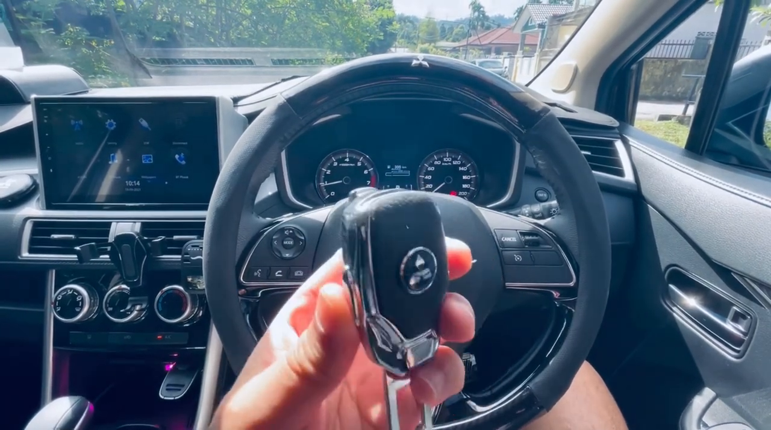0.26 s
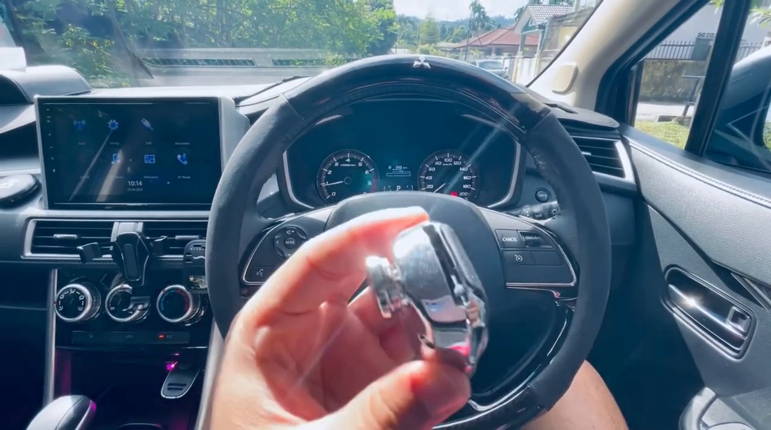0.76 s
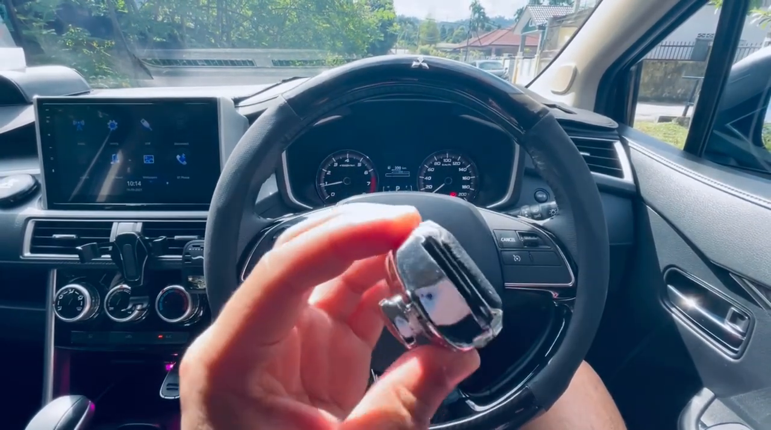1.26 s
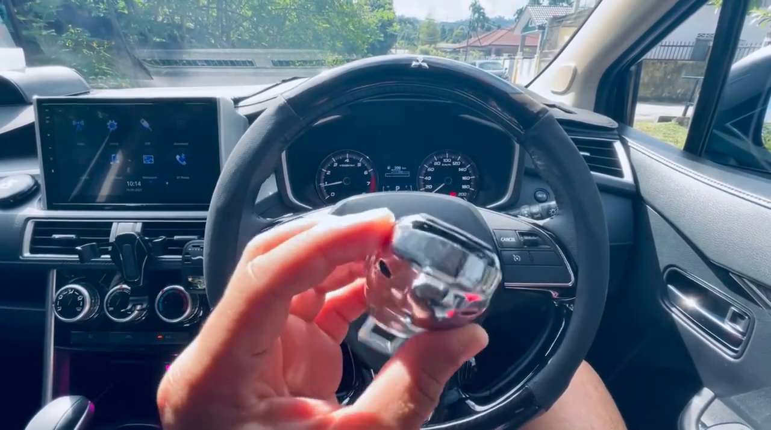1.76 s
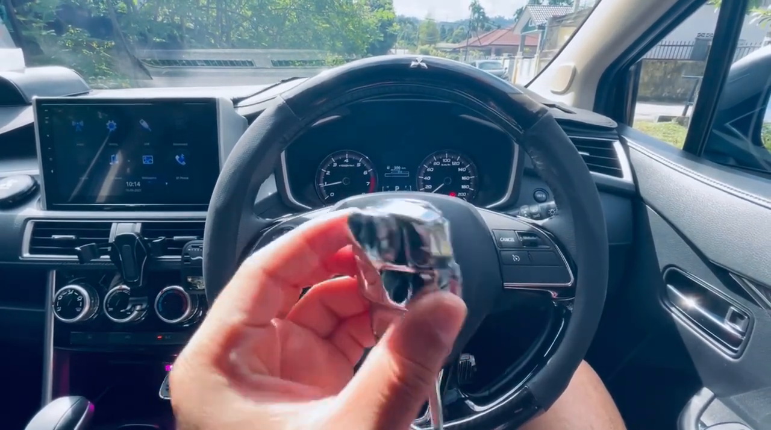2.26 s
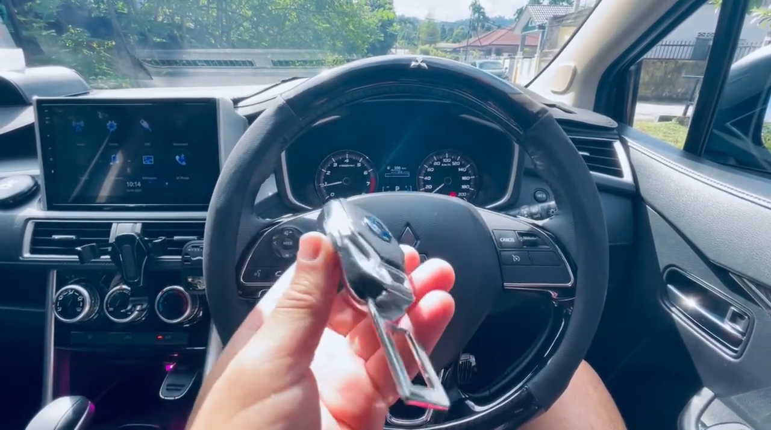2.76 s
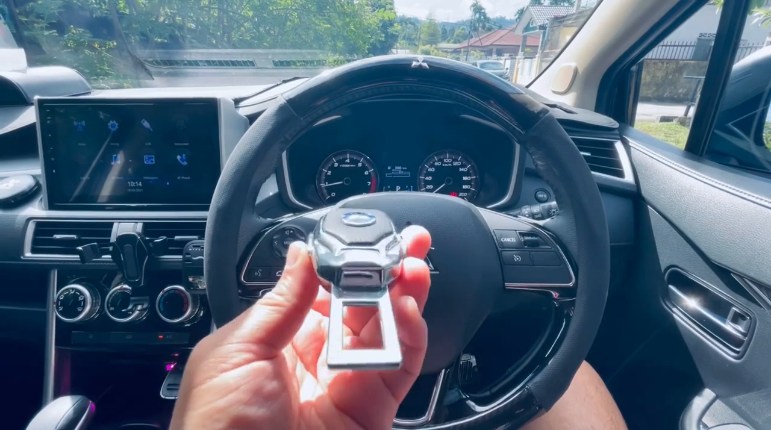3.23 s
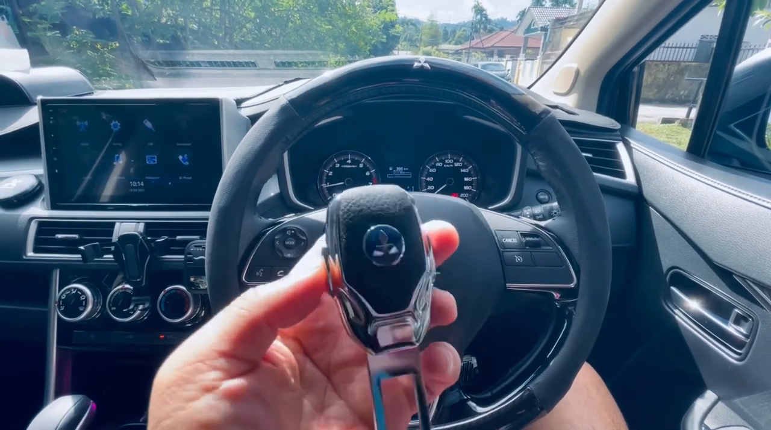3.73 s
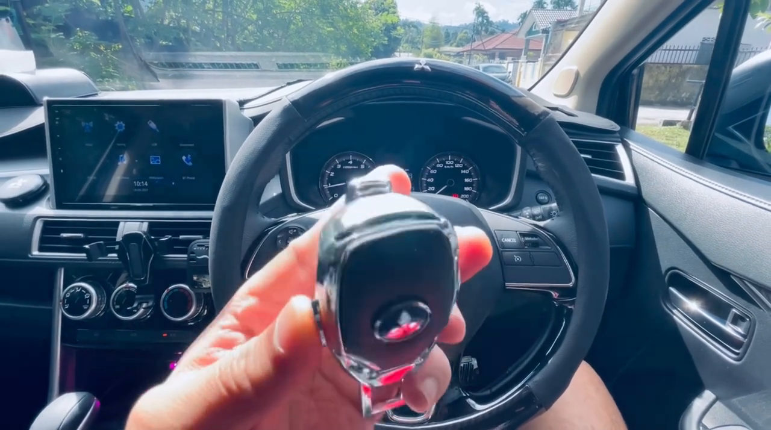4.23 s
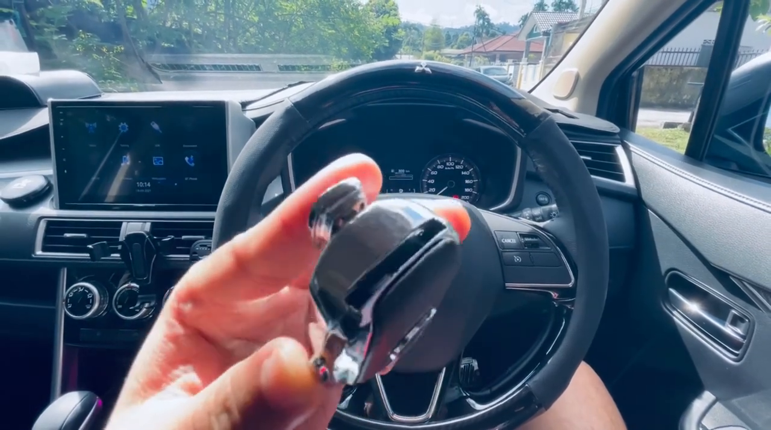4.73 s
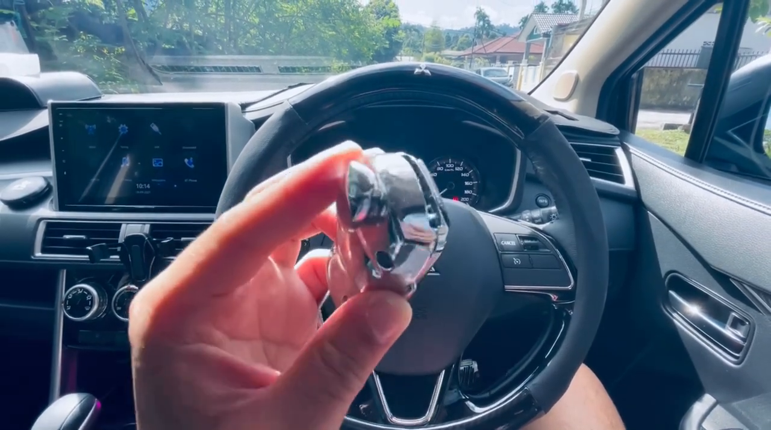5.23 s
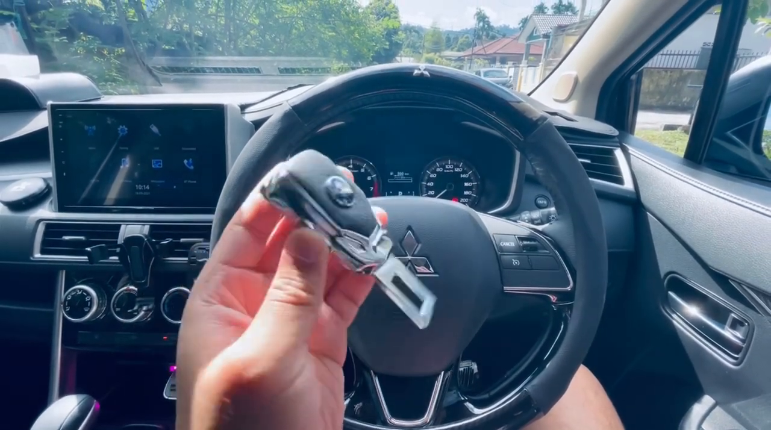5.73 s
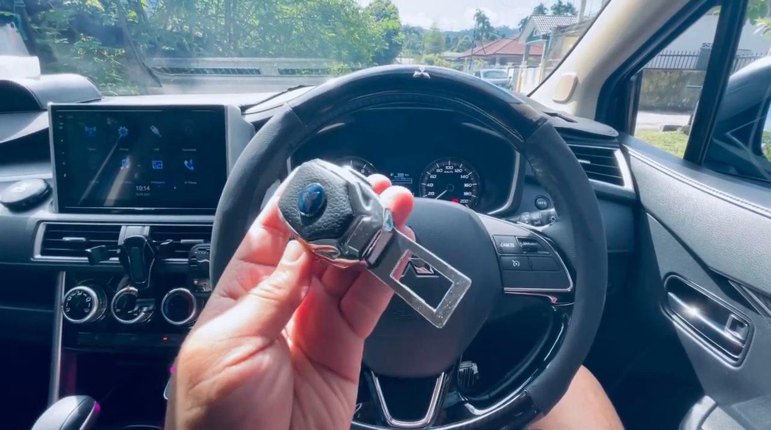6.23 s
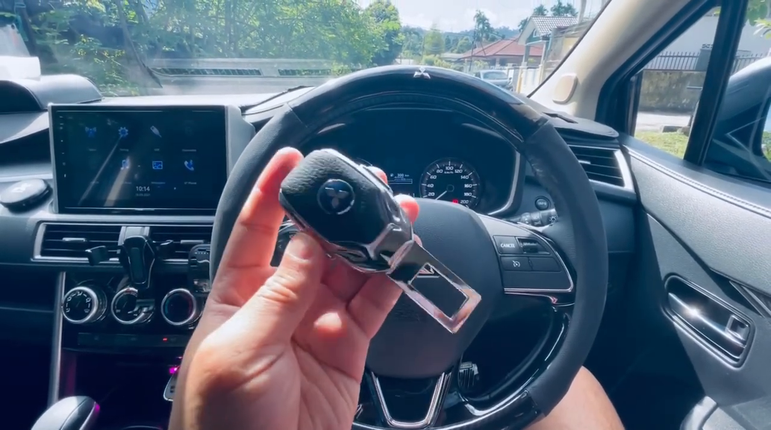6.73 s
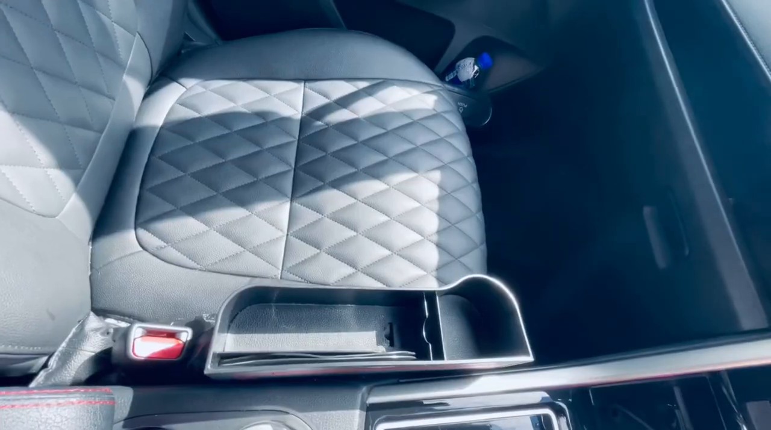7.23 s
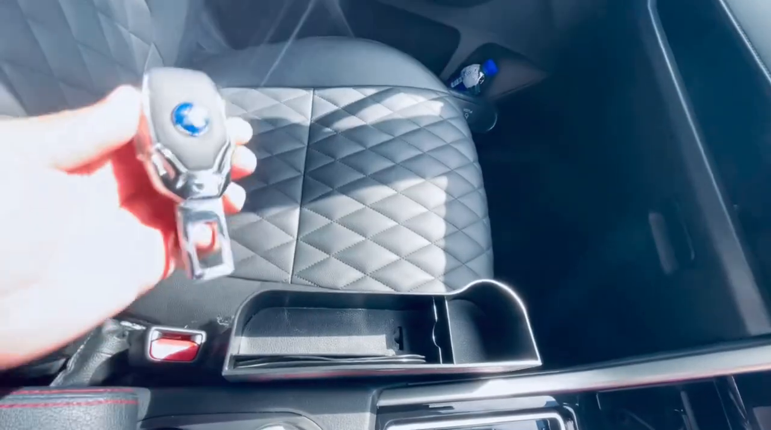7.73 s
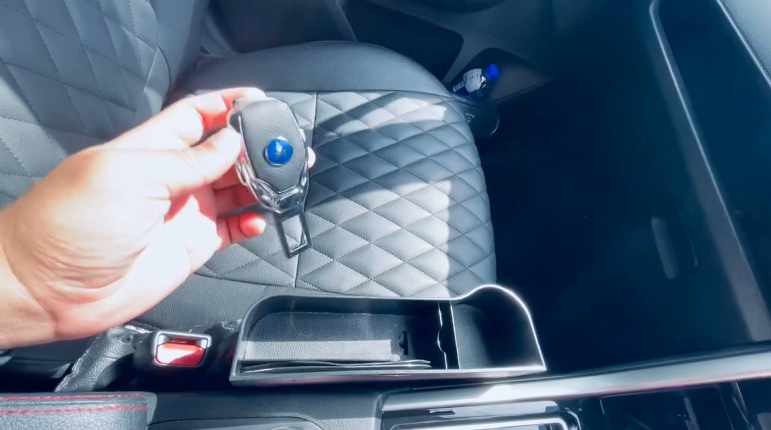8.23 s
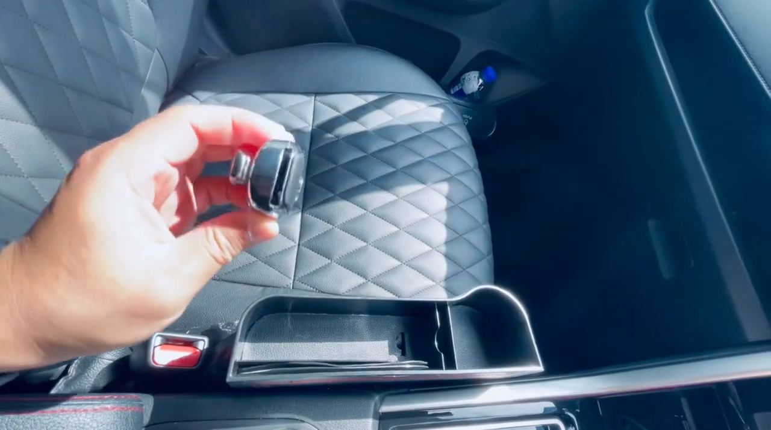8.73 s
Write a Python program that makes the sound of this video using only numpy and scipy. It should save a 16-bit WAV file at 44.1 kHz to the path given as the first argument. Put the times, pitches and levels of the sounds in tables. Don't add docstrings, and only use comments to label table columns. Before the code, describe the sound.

Inside a parked idling car, a deep steady engine hum and soft air conditioning hiss run throughout. A dull bump on the microphone case comes early, with fainter nudges and two tiny metal ticks. Around seven seconds the sound cuts to the seat: cloth drags briskly over upholstery while a loose metal tongue rattles, then sparse ticks and short rubs follow. Close stereo microphone, small padded cabin.

```python
import sys
import numpy as np
from scipy import signal
from scipy.fft import rfft, irfft, next_fast_len
from scipy.io import wavfile

SR = 44100
rng = np.random.default_rng(int(sys.argv[2]) if len(sys.argv) > 2 else 0)


def to_linear_factor(level_db):
    exponent = np.asarray(level_db, float) / 20
    return 10 ** exponent


def output_pcm(signal):
    pcm = np.clip(np.atleast_2d(signal).T, -1, 1) * 32767
    wavfile.write(sys.argv[1], SR, np.round(pcm).astype(np.int16))


N = 396018
SIZE = next_fast_len(N + 4096)
START_HEIGHT, START_DECAY_S = -.011, .003
MOVE_S, MOVE_STEP_HEIGHT = 7.0393, .012
MIC_TOP_HZ = 16800

FIRING_HZ, COMPRESSOR_HZ, WHINE_HZ, REED_HZ = 28.28, 186.75, 3860, 4404
BLADE_HZ, BLADE_WANDER_HZ = 174.0, .6

# multiple of the base frequency, level at wheel in dB, level at seat in dB, wobble in dB,
# left over right in dB.
ENGINE_ORDERS = [(1, -49.5, -59, .5, .1), (2, -46.5, -43, 1.6, .1), (3, -50, -53, 2.2, .1),
                 (4, -48, -49, 2.2, -.4), (5, -60, -62, 2.2, -1.5), (9, -75, -53, 1.8, 1.5),
                 (10, -72, -62, 2.2, 1.5)]
COMPRESSOR_HARMONICS = [(1, -50, -50, .8, -2.5), (2, -68, -68, 1.5, 2.5), (3, -70, -69, 1.5, 2.5)]
FAN_HARMONICS = [(1, -47.5, -54.5, 2, -5), (2, -67.5, -97, 2, -10.5)]
WHINE_HARMONICS = [(1, -90, -110, 1.2, 0)]
REED_HARMONICS = [(1, -110, -85, 1.5, 0)]

# frequency in Hz, density in dB per Hz.
RUMBLE_WHEEL = [(8.2, -38.5), (14, -21), (76, 4), (98, 1.5), (135, -7), (177, -5.5), (203, -10.5),
                (236, -16.5), (262, -23), (300, -19.5), (367, -17), (542, -20.5), (699, -27), (800, -23),
                (1040, -59.5), (1760, -120)]
RUMBLE_SEAT = [(8.2, -29), (14, -10.5), (54, -0.5), (92, 4), (145, -5.5), (187, -6), (225, -10.5),
               (271, -10), (349, -14), (406, -15), (442, -22), (490, -15.5), (642, -24), (711, -45),
               (800, -32), (1040, -26.5), (1760, -120)]
VENT_WHEEL = [(350, -34), (600, -12), (702, -10), (876, 2), (948, -1), (999, -1), (1380, -1.5), (1640, -11),
              (2000, -14), (2270, -17.5), (2460, -24.5), (2990, -24), (3790, -28.5), (4790, -35),
              (13500, -45.5), (14000, -80.5)]
VENT_SEAT = [(350, -62), (600, 11), (720, 0), (854, 8.5), (1030, -1), (1300, 5.5), (1540, -3), (1970, -7.5),
             (2950, -18.5), (4260, -15.5), (4850, -27), (6140, -27.5), (11200, -31), (12900, -30),
             (13500, -42.5), (14000, -80)]
# at wheel in dB, at seat in dB.
RUMBLE_DB = [-38, -39]
VENT_DB = [-56, -53]
# frequency in Hz, width in Hz, level over hiss in dB.
DUCT_WHEEL = [(356.3, 12, 5.5), (2473, 110, 12), (3400, 740, 3), (12000, 250, -2.5)]
DUCT_SEAT = [(920, 430, 2.6), (1310, 38, 5.7), (3800, 190, 1.8), (11600, 300, 3)]
WHISTLES_WHEEL = [(407, 8, 6), (436, 6, 7), (489, 10, 4), (537, 10, 5), (1965, 60, 5), (3850, 70, 7),
                  (4397, 15, 10), (5855, 30, 6), (6075, 60, 7), (13110, 40, 11)]
WHISTLES_SEAT = [(4404, 30, 8)]

# frequency in Hz, likeness 0 to 1.
LIKE_WHEEL = [(30, .62), (100, .7), (200, .65), (300, .3), (600, .5), (1000, .5), (1250, .4), (2000, .55),
              (3500, .35), (5000, .25), (9000, .25), (10800, .45), (11400, .9), (14000, .7)]
LIKE_SEAT = [(30, .7), (170, .88), (450, .5), (1000, .38), (2000, .62), (4000, .55), (6000, .6),
             (9000, .25), (10800, .45), (11600, .85), (12500, .7), (13300, .55), (14400, .85)]
# frequency in Hz, phase in radians.
LEAD_WHEEL = [(0, 0), (520, 0), (800, 2.6), (1100, 3.1), (1600, 3.5), (2300, 6.3), (5500, 15.7), (9000, 22),
              (11000, 18.85), (12500, 18.85), (14000, 15.7)]
LEAD_SEAT = [(0, 0), (300, -.3), (600, -2), (1600, -2.6), (2500, 0), (6000, 9.4), (9000, 15.7),
             (11000, 12.9), (11700, 12.57), (12400, 12.1), (13100, 11.3), (14400, 9.4)]
# frequency in Hz, left over right in dB.
TILT_WHEEL = [(60, 2), (190, -4.5), (430, 5.5), (680, -1), (870, 7), (1600, -0.5), (3500, -1.5),
              (6000, 3.5), (8000, 1), (9600, -7.5), (11000, -0.5)]
TILT_SEAT = [(60, -2), (350, 5), (700, 0.5), (3800, -1.5), (5500, 2), (8000, 1), (9600, -13.5), (11000, 0)]

KNOCK_S, KNOCK_HZ = 1.0768, 180
NUDGE_RISE_S, NUDGE_HZ = .006, 200
# left in dB, right in dB.
KNOCK_DB = [-17.5, -28.5]
# left in dB, right in dB.
NUDGE_DB = [4, -1.5]
# onset in seconds, peak in dB.
NUDGES = [
    (0.657, -37),
    (1.799, -45),
    (2.25, -39),
    (4.066, -43),
]

# start in seconds, peak in dB, frequency in Hz, t60 in seconds.
THUDS = [
    (7.25, -45, 844, .06),
    (7.339, -42.5, 638, 0.13),
    (7.632, -45, 874, .08),
    (7.775, -53, 920, .05),
]

# time in seconds, drag in dB, cushion pressure in dB.
DRAG = [
    (7.044, -60, -10),
    (7.065, -50.5, -7),
    (7.125, -38.5, 8),
    (7.2, -45, -11),
    (7.27, -45.5, 13),
    (7.315, -53.5, -9),
    (7.345, -46, 11),
    (7.43, -56, 10),
    (7.46, -62, -4),
]
# start in seconds, hold in seconds, drag in dB, brightness in dB.
RUBS = [(7.462, 0.0059, -68, -8), (7.493, 0.06, -61, 5.5), (7.61, 0.02, -61, -3), (7.633, 0.039, -51, -1.5),
        (7.722, 0.02, -57.5, 1), (7.746, 0.021, -60, -8), (7.774, 0.02, -55.5, -2),
        (7.856, 0.0073, -64.5, 8), (7.876, .018, -70, 3), (7.943, .01, -66, -10), (8.021, 0.019, -59.5, 1),
        (8.07, 0.01, -67, 7), (8.136, .014, -66.5, 4), (8.488, 0.01, -64, 4), (8.643, 0.03, -61.5, 4),
        (8.886, 0.017, -63, -19), (8.928, 0.0158, -69, -9), (8.966, .02, -68, 14.5), (1.769, .015, -75, 2),
        (1.799, 0.0074, -77, 21.5)]
RUB_ATTACK_S, RUB_RELEASE_DB_PER_S, RUB_PRESS_DB, SWEEP_BRIGHT_DB = 0.0018, 498, 9.5, 3.5
# frequency in Hz, density in dB per Hz.
CLOTH = [(290, -13), (500, -5), (632, -6), (706, -10.5), (869, -7), (1080, -12), (1510, -6.5), (2020, -7.5),
         (2890, -7.5), (3660, 6), (4700, -3.5), (6020, -2), (7940, -5.5), (12200, -16.5), (13300, -20),
         (13900, -60.5)]
# frequency in Hz, width in Hz, level in dB.
SEAT_BODY = [(2520, 140, 8), (2780, 110, 10), (3150, 200, 7), (4820, 44, -10), (6000, 200, -4),
             (7170, 370, -16)]
SLIP_TOGETHER, SLIP_APART = .2, .42
CLUMP_DB, CLUMPS_PER_S = 1.0, 14

# start in seconds, peak in dB.
GLINTS = [(7.2515, -46.5), (7.2575, -56.5), (7.266, -55), (7.328, -54), (7.339, -51.5), (7.344, -53),
          (7.618, -58), (7.6315, -67), (7.647, -59.5), (7.658, -61), (7.664, -65), (7.749, -56),
          (7.7585, -62), (7.7748, -61.5), (7.7873, -58), (7.8045, -71), (7.859, -67), (7.8815, -65),
          (8.0235, -68), (8.071, -66), (8.492, -57), (8.6457, -55), (8.667, -72), (8.888, -72),
          (1.7995, -74)]
GLINT_DECAY_S, GLINT_LOW_HZ = .0015, 13900
GLINT_APART = .6

# start in seconds, peak in dB, ring in Hz, second ring in Hz, second ring level in dB.
WHEEL_TICKS = [
    (1.7692, -59, 7800, 4200, -3),
    (1.7990, -48, 6300, 12200, -4),
]
SEAT_TICKS = [(7.0626, -38, 2670, 5620, -4.5), (7.066, -39, 3170, 6400, -11), (7.0934, -40.5, 4160, 9170, -10),
              (7.1084, -34, 9370, 3340, -5), (7.1185, -33, 8400, 12300, -2), (7.1226, -30.5, 3270, 6400, -7),
              (7.134, -35.5, 3380, 7340, 1.5), (7.144, -29.5, 4670, 8230, -6), (7.1606, -33, 3750, 10700, -4),
              (7.1686, -35, 3360, 5620, -3), (7.1967, -38, 2710, 8350, -6), (7.2207, -37, 2970, 5560, -10),
              (7.2315, -36, 2990, 6760, -9), (7.252, -26.5, 3020, 7800, -3), (7.258, -42, 3470, 7360, -6.5),
              (7.2835, -38, 6350, 2430, 4), (7.2886, -31, 3570, 5560, 0), (7.3132, -39, 2760, 6120, -9),
              (7.3165, -44, 8030, 2930, -2.5), (7.3285, -41.5, 11500, 3000, -2),
              (7.3358, -34.5, 2800, 7600, -4), (7.339, -35, 7900, 12200, -3), (7.3395, -33, 4300, 2600, -3),
              (7.3438, -33, 12300, 6400, -4), (7.355, -33.5, 2890, 5770, -7), (7.371, -42, 3550, 5510, -7),
              (7.3806, -35.5, 2990, 6310, 2), (7.385, -40.5, 8180, 3210, -4), (7.3947, -39.5, 6520, 8530, -5.5),
              (7.406, -40, 5320, 8050, -13), (7.415, -43, 5560, 8230, -1),
              (7.4284, -48, 3450, 6290, 5), (7.4347, -37.5, 3490, 6420, 0),
                  (7.4667, -45, 8300, 4890, -6), (7.482, -61, 2970, 5190, -2),
                  (7.495, -53.5, 5120, 2520, -4), (7.4998, -47, 4690, 9580, -1),
                  (7.504, -53, 5750, 2650, 0), (7.5174, -45, 2500, 5380, -13),
                  (7.5293, -43.5, 10100, 6610, -3), (7.558, -50.5, 10720, 5640, -2),
                  (7.6107, -53, 6550, 4180, 8), (7.6176, -42.5, 5170, 2650, -5),
                  (7.6313, -41.5, 8290, 4650, 2), (7.6468, -37, 5050, 2670, -7),
                  (7.6583, -48, 2730, 7840, -0.5), (7.6862, -55, 3450, 8160, -9),
                  (7.7237, -52, 4130, 6650, -10), (7.7297, -50, 3880, 9070, -6),
                  (7.748, -47, 12500, 6830, -3), (7.7537, -46, 6400, 2930, -1),
                  (7.759, -42.5, 8420, 12980, 1), (7.7759, -41.5, 5750, 8000, -3),
                  (7.7763, -39, 3000, 4800, -4), (7.788, -32.5, 5350, 7640, 0),
                  (7.805, -43.5, 5300, 7710, 1),
              (7.8495, -51, 3830, 12210, -8), (7.859, -48, 4540, 7990, 1),
                 (7.8626, -55.5, 4540, 2580, -2), (7.8758, -44, 9150, 4010, -5),
                 (7.8813, -42, 7770, 12420, -2), (7.9471, -45, 4900, 2650, -2),
                 (8.0044, -47, 4940, 2950, -5), (8.0232, -41, 4970, 7000, -8),
                 (8.0712, -47, 6500, 3080, -4), (8.08, -53, 6070, 2480, -7), (8.1268, -56, 4460, 2370, -10),
                 (8.139, -48.5, 6660, 4630, -9), (8.324, -59, 3940, 6030, -11),
                 (8.4857, -53.5, 5920, 2540, 0), (8.4924, -40, 6360, 10300, -4),
                 (8.4977, -51, 3570, 7240, -5), (8.6136, -54, 3210, 5450, -10),
                 (8.6462, -37, 9500, 5060, -1), (8.6673, -46, 6300, 4220, 2),
                 (8.6835, -54, 4410, 9150, -11), (8.7316, -55, 3450, 9630, -17),
                 (8.766, -57.5, 4690, 9600, -3), (8.7852, -54, 4030, 8310, -14),
                 (8.8865, -44.5, 4000, 6570, -2), (8.9312, -50, 2860, 6370, -16),
                 (8.9334, -57, 2800, 5210, -12), (8.9694, -50, 8660, 6590, -7)]
CRACK_DECAY_S, CRACK_LOW_HZ, RING_WIDTH_HZ = 0.00099, 1980, 1900
CRACK_DB, CRACK_DB_PER_DB = -10.5, 0.7
CRACK_IN_SWEEP_DB = -8
TAIL_DB, TAIL_WIDE = -8.5, 0.99


def rms_one(x):
    return x / np.sqrt(np.mean(x ** 2) + 1e-30)


def at_hz(points, hz):
    points = np.array(points)
    return np.interp(np.log(hz + 1), np.log(points[:, 0] + 1), points[:, 1])


def drift(changes_per_s):
    pole = np.exp(-80 * np.pi * changes_per_s / SR)
    white = rng.standard_normal(N // 40 + 4002)
    slow = signal.lfilter([1], [1, -2 * pole, pole * pole], white)[4000:]
    return np.interp(np.arange(N) / 40, np.arange(len(slow)), rms_one(slow))


def filtered(x, order, hz, kind):
    return signal.sosfilt(signal.butter(order, hz, kind, fs=SR, output="sos"), x)


def colour(pair, spectrum, peaks=()):
    hz = np.fft.rfftfreq(SIZE, 1 / SR)
    gain = to_linear_factor(at_hz(spectrum, hz))
    for peak_hz, width_hz, db in peaks:
        gain = gain * (1 + (to_linear_factor(db) - 1) / (1 + (2 * (hz - peak_hz) / width_hz) ** 2))
    return irfft(rfft(pair, SIZE) * gain, SIZE)


def ports(pair, like, lead, tilt):
    hz = np.fft.rfftfreq(SIZE, 1 / SR)
    left, other = rfft(pair)
    alike = np.clip(at_hz(like, hz), 0, 1)
    delay = np.exp(-1j * np.interp(hz, *np.transpose(lead)))
    right = alike * delay * left + np.sqrt(1 - alike ** 2) * other
    half_tilt = to_linear_factor(at_hz(tilt, hz) / 2)
    return irfft([left * half_tilt, right / half_tilt], SIZE)[:, :N]


def cabin_air(rumble, rumble_db, vent, vent_db, resonances):
    low = rms_one(colour(rng.standard_normal((2, SIZE)), rumble, resonances))
    flutter = np.resize(to_linear_factor(.3 * drift(9)), SIZE)
    high = rms_one(colour(rng.standard_normal((2, SIZE)) * flutter, vent, resonances))
    return to_linear_factor(rumble_db) * low + to_linear_factor(vent_db) * high


def tones(rows, hz, wobbles_per_s):
    turns = np.cumsum(hz * np.ones(N)) / SR
    seat = np.arange(N) >= MOVE_S * SR
    port_lag_turns = np.array([[0], [.08]])
    out = 0
    for multiple, wheel_db, seat_db, wobble_db, pan_db in rows:
        level = to_linear_factor(np.where(seat, seat_db, wheel_db) + wobble_db * drift(wobbles_per_s))
        start = rng.random(2)[seat * 1]
        phase_turns = np.round(multiple) * turns + start + port_lag_turns
        wave = np.sqrt(2) * level * np.sin(2 * np.pi * phase_turns)
        out = out + wave * to_linear_factor([[pan_db / 2], [-pan_db / 2]])
    return out


def machines():
    blade_hz = BLADE_HZ + BLADE_WANDER_HZ * drift(1.5)
    out = tones(ENGINE_ORDERS, FIRING_HZ, 3.6)
    out = out + tones(COMPRESSOR_HARMONICS, COMPRESSOR_HZ, 0.39)
    out = out + tones(FAN_HARMONICS, blade_hz, 3.8)
    out = out + tones(WHINE_HARMONICS, WHINE_HZ + 9 * drift(12), 6)
    return out + tones(REED_HARMONICS, REED_HZ + 4 * drift(8), 5)


def push(crest_s, hz, pair_db):
    u = (np.pi * hz * (np.arange(N) / SR - crest_s)) ** 2
    return (1 - 2 * u) * np.exp(-u) * to_linear_factor(pair_db)[:, None]


def knock():
    out = push(KNOCK_S, KNOCK_HZ, KNOCK_DB)
    for s, db in NUDGES:
        out = out + push(s + NUDGE_RISE_S, NUDGE_HZ, np.add(NUDGE_DB, db))
    return out


def thuds():
    t, out = np.arange(N) / SR, 0
    for s, peak_db, hz, t60_s in THUDS:
        age_s = np.maximum(t - s, 0)
        out = out + to_linear_factor(peak_db - 60 * age_s / t60_s) * np.sin(2 * np.pi * hz * age_s)
    return out


def slips(per_s, decay_s):
    size = to_linear_factor(4.0 * np.minimum(rng.exponential(1, N), 3))
    marks = (rng.random(N) < per_s / SR) * size
    return signal.lfilter([1], [1, -np.exp(-1 / (decay_s * SR))], marks + 1e-18)


def effort():
    t = np.arange(N) / SR
    s, drag_db, press_db = np.transpose(DRAG)
    release_db = RUB_RELEASE_DB_PER_S * np.maximum(t - s[-1], 0)
    level = to_linear_factor(np.interp(t, s, drag_db) - release_db) * (t > s[0])
    bright = level * to_linear_factor(SWEEP_BRIGHT_DB)
    press = level * to_linear_factor(np.interp(t, s, press_db))
    for start_s, held_s, rub_db, bright_db in RUBS:
        attack = np.clip((t - start_s) / RUB_ATTACK_S + .5, 0, 1)
        release_db = RUB_RELEASE_DB_PER_S * np.maximum(t - start_s - held_s, 0)
        rub = attack * to_linear_factor(rub_db - release_db)
        level = level + rub
        bright = bright + rub * to_linear_factor(bright_db)
        press = press + rub * to_linear_factor(RUB_PRESS_DB)
    return level, bright, press


def sleeve():
    level, bright, press = effort()
    together, white, grains = slips(440, 0.001), rng.standard_normal((2, N)), 0
    edges_hz = [300, 3700, 6000, 9500, 18000]
    for low_hz, high_hz in zip(edges_hz, edges_hz[1:]):
        band = filtered(white, 2, [low_hz, high_hz], "band")
        slipping = 1 + SLIP_TOGETHER * together + SLIP_APART * slips(220, 0.0011)
        grains = grains + band * slipping * to_linear_factor(CLUMP_DB * drift(CLUMPS_PER_S))
    cloth = rms_one(colour(grains, CLOTH, SEAT_BODY)[:, :N])
    top = filtered(cloth, 2, 5500, "high")
    body = filtered(cloth, 2, 1300, "low")
    return level * cloth + (bright - level) * top + (press - level) * body


def glints():
    out, t = np.zeros((2, N + 600)), np.arange(600) / SR
    chance = rng.standard_normal((len(GLINTS), 2, len(t)))
    for (s, peak_db), noise in zip(GLINTS, chance):
        at = round(s * SR)
        burst = filtered(noise * np.exp(-t / GLINT_DECAY_S), 6, GLINT_LOW_HZ, "high")
        out[:, at:at + len(t)] += to_linear_factor(peak_db) * burst
    shared, apart = out[:, :N]
    return shared + GLINT_APART * apart * [[1], [-1]]


def resonate(x, hz):
    mode = signal.iirpeak(min(hz, 14000), hz / RING_WIDTH_HZ, fs=SR)
    return signal.lfilter(*mode, signal.lfilter(*mode, x))


def buckle():
    out, t = np.zeros((2, N + 2600)), np.arange(2600) / SR
    band_hz = [CRACK_LOW_HZ, 13200]
    ticks = WHEEL_TICKS + SEAT_TICKS
    chance = rng.standard_normal((len(ticks), 2, len(t)))
    chance[:, :, 0] = 5
    for (s, peak_db, hz, second_hz, second_db), noise in zip(ticks, chance):
        crack = filtered(noise * np.exp(-t / CRACK_DECAY_S), 3, band_hz, "band")
        ring = resonate(crack, hz) + to_linear_factor(second_db) * resonate(crack, second_hz)
        in_sweep = DRAG[0][0] < s < DRAG[-1][0]
        crack_db = CRACK_DB + CRACK_DB_PER_DB * (peak_db + 34.5) + CRACK_IN_SWEEP_DB * in_sweep
        tick = to_linear_factor(crack_db) * crack + ring
        wash = filtered(noise * np.exp(-t / .012), 3, band_hz, "band") / 2
        wide = signal.lfilter([.5, .5], [1], wash)
        mode = signal.iirpeak(min(hz, 14000), hz / RING_WIDTH_HZ, fs=SR)
        tail = TAIL_WIDE * wide + signal.lfilter(*mode, wash)
        at = round(s * SR)
        peak = np.abs(tick[:, :100]).max()
        out[:, at:at + len(t)] += to_linear_factor(peak_db - 2.5) * (tick / peak + to_linear_factor(TAIL_DB) * tail)
    return out[:, :N]


def scene():
    t = np.arange(N) / SR
    handling = np.pad(sleeve() + buckle() + thuds(), [(0, 0), (0, SIZE - N)])
    wheel_air = cabin_air(RUMBLE_WHEEL, RUMBLE_DB[0], VENT_WHEEL, VENT_DB[0], DUCT_WHEEL + WHISTLES_WHEEL)
    seat_air = cabin_air(RUMBLE_SEAT, RUMBLE_DB[1], VENT_SEAT, VENT_DB[1], DUCT_SEAT + WHISTLES_SEAT)
    wheel = ports(wheel_air + handling, LIKE_WHEEL, LEAD_WHEEL, TILT_WHEEL)
    seat = ports(seat_air + handling, LIKE_SEAT, LEAD_SEAT, TILT_SEAT)
    at_wheel = t < MOVE_S
    join = np.clip(np.where(at_wheel, (MOVE_S - t) / .004, (t - MOVE_S) / .02), 0, 1)
    step = MOVE_STEP_HEIGHT * (1 - join) * at_wheel
    return join * (np.where(at_wheel, wheel, seat) + machines()) + step + knock() + glints()


def band_limit(x):
    return signal.sosfilt(signal.butter(12, 16000, fs=SR, output="sos"), x)


def record(dry):
    bass_cut = signal.butter(3, 21, "high", fs=SR, output="sos")
    top_cut = signal.cheby2(10, 60, MIC_TOP_HZ, fs=SR, output="sos")
    run_in = 2 * dry[:, :1] - dry[:, 8000:0:-1]
    mix = signal.sosfilt(np.vstack([bass_cut, top_cut]), np.hstack([run_in, dry]))[:, -N:]
    n = np.arange(N)
    mix = mix * np.clip(.4 + n / 600, 0, 1)
    mix = mix * np.clip((N - n) / 150, 0, 1)
    mix = mix + START_HEIGHT * np.exp(-n / SR / START_DECAY_S)
    return band_limit(mix)


dry = scene()
out = record(dry)
output_pcm(out)
```